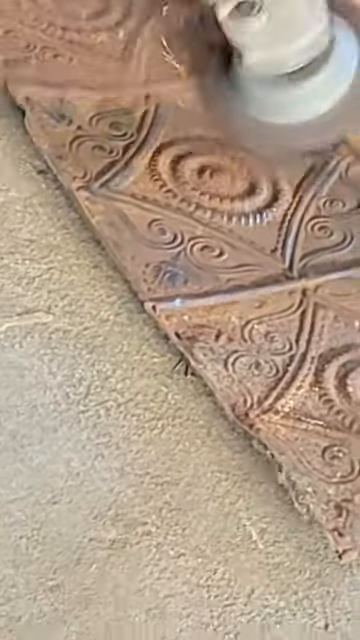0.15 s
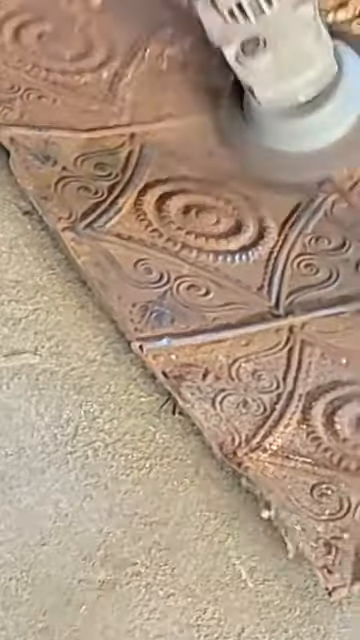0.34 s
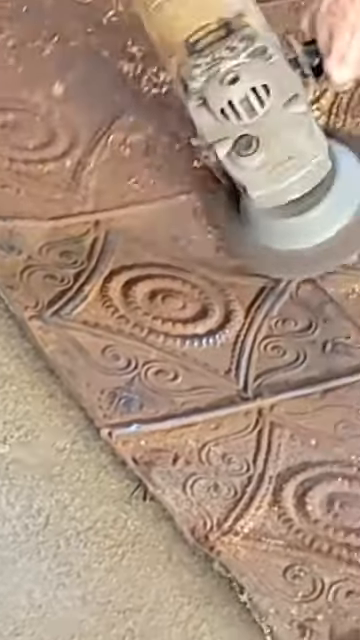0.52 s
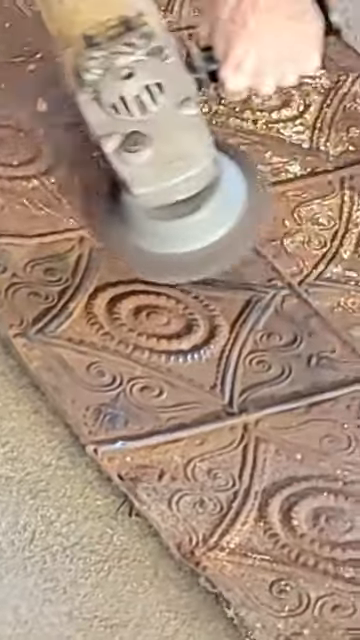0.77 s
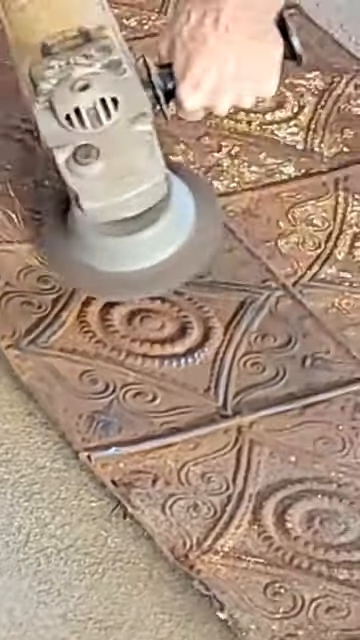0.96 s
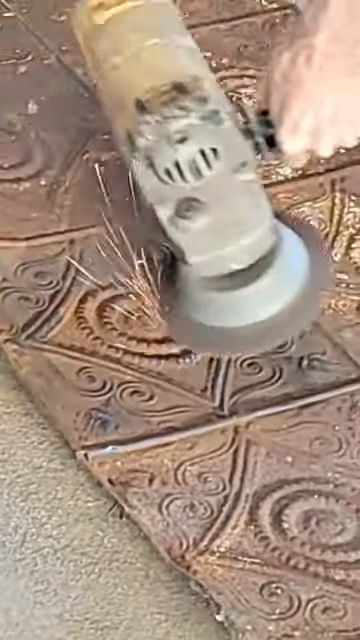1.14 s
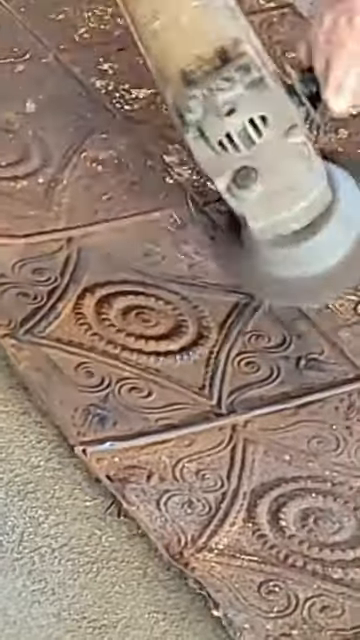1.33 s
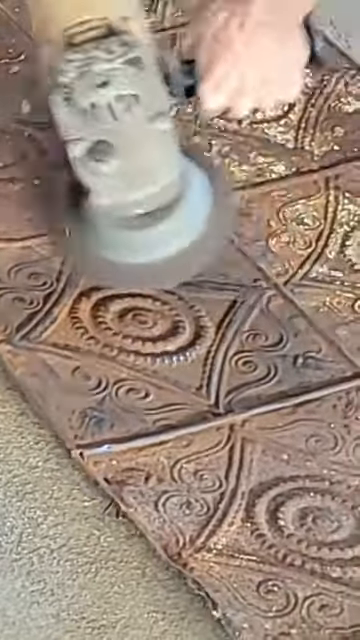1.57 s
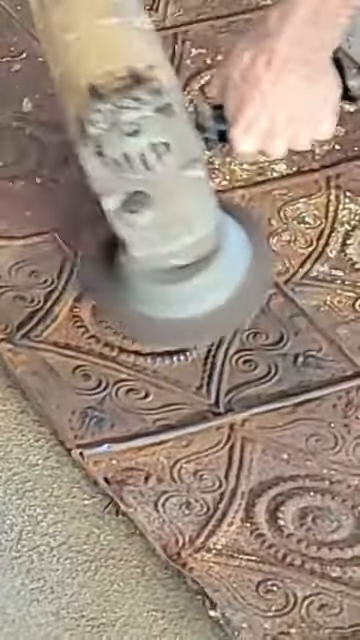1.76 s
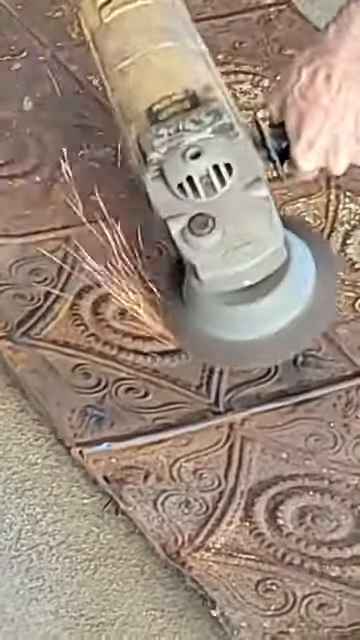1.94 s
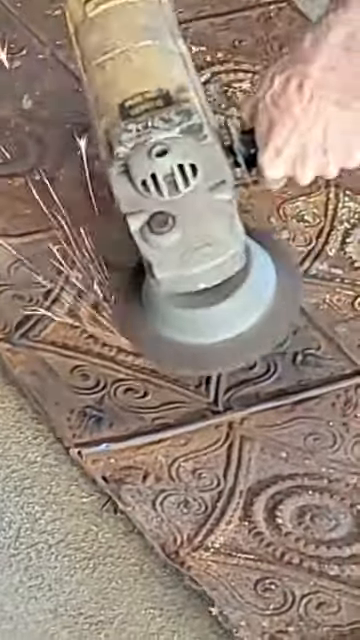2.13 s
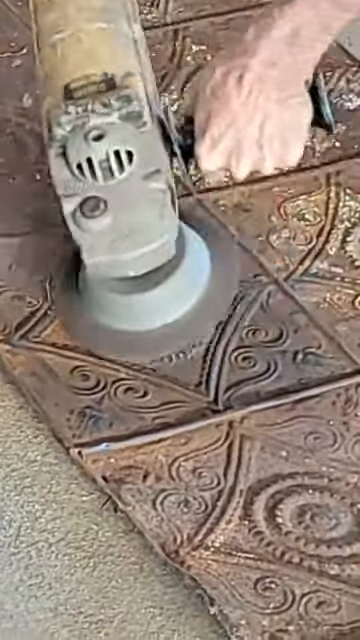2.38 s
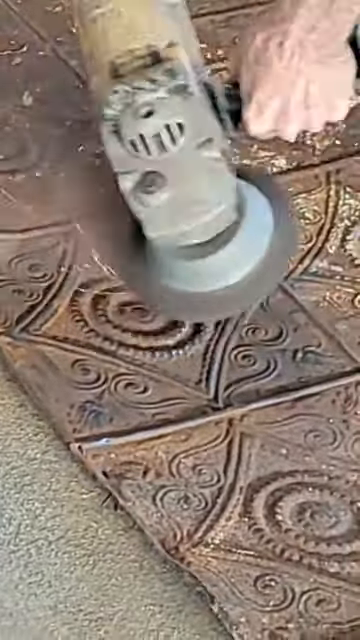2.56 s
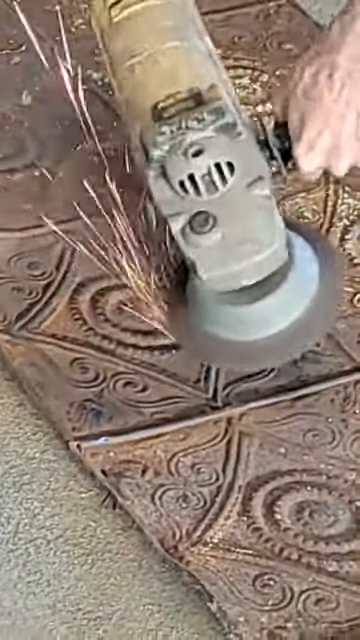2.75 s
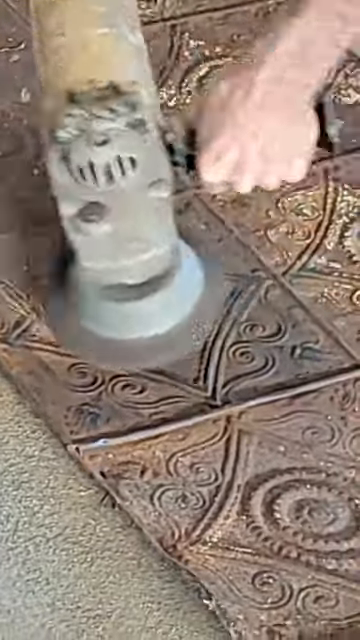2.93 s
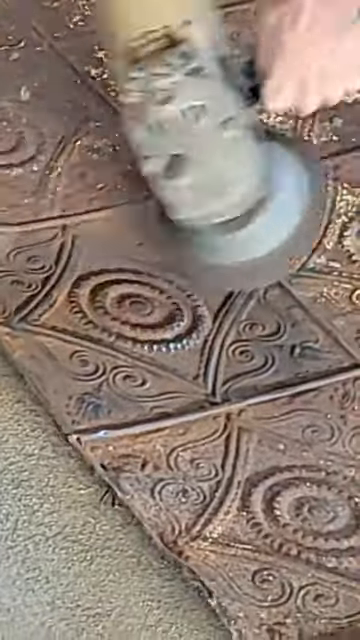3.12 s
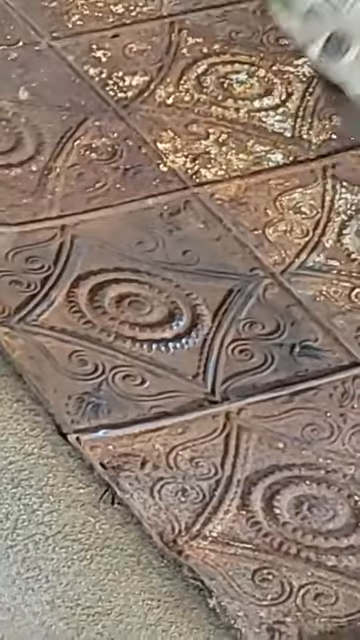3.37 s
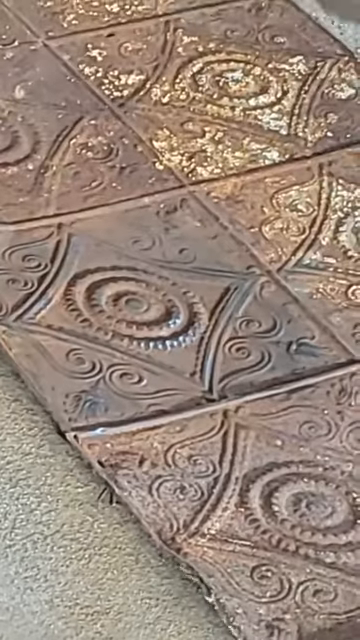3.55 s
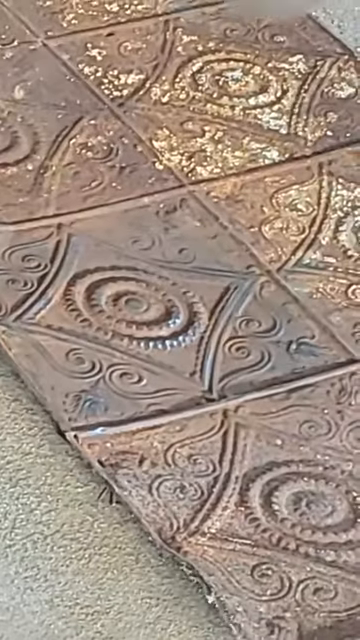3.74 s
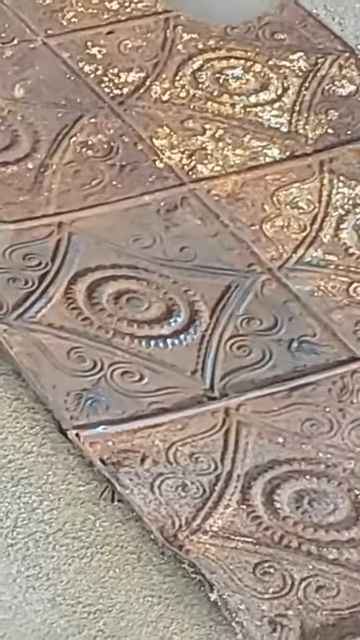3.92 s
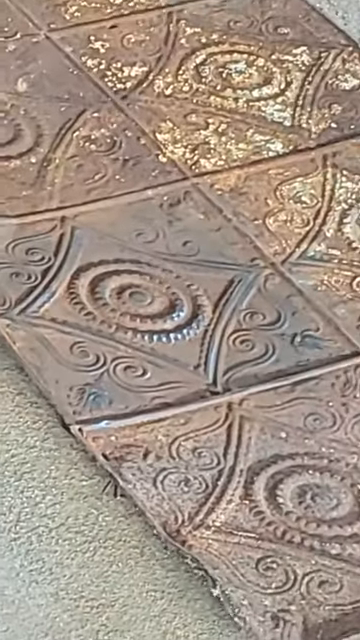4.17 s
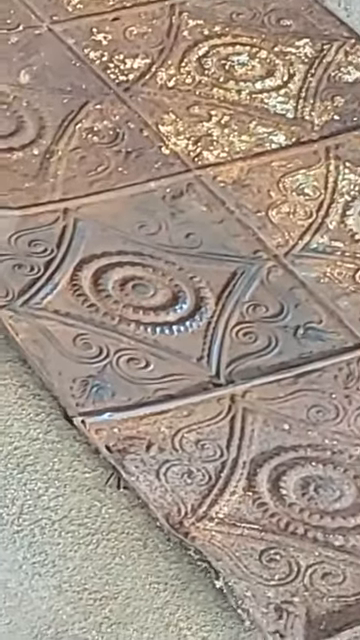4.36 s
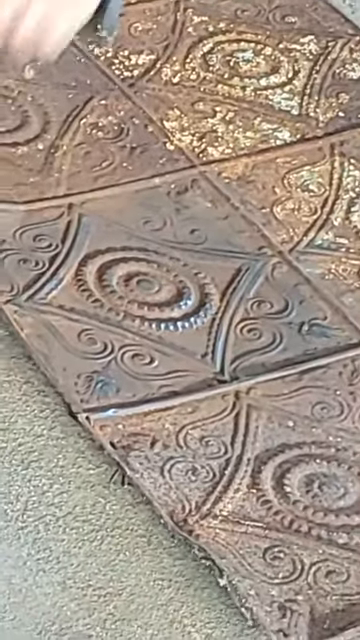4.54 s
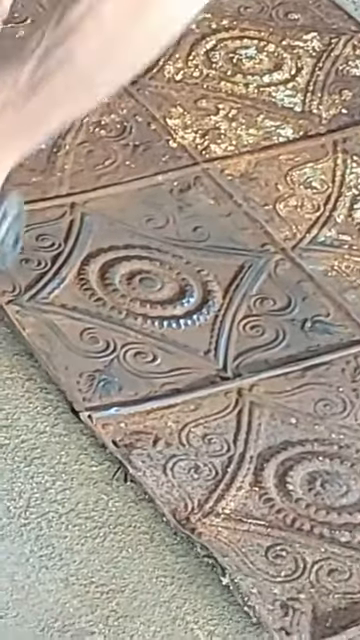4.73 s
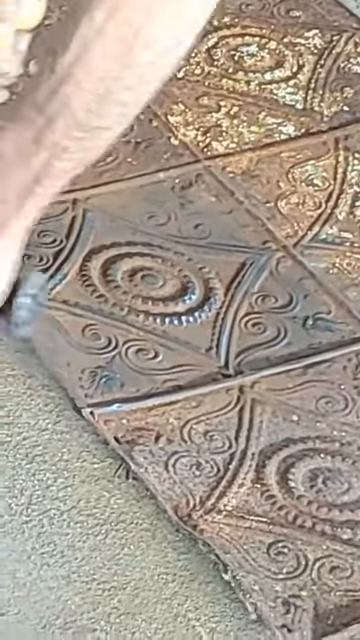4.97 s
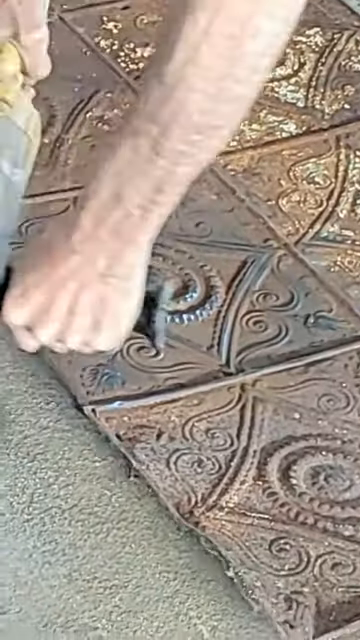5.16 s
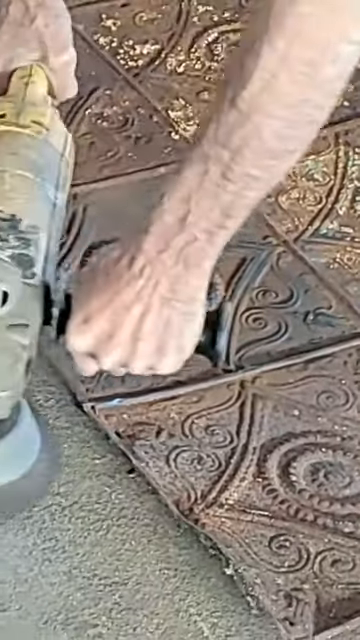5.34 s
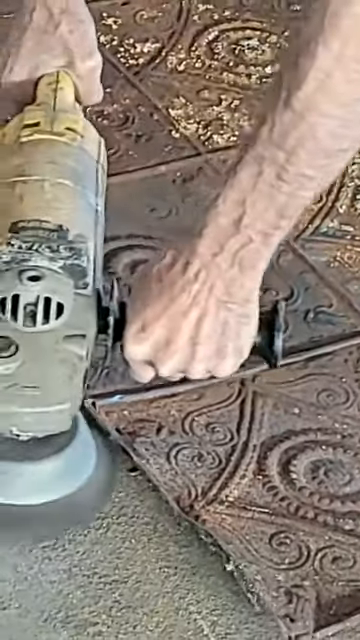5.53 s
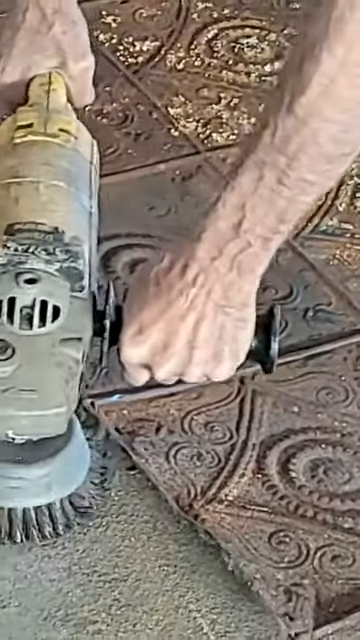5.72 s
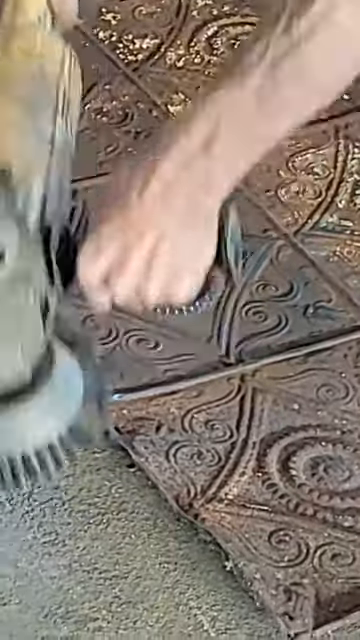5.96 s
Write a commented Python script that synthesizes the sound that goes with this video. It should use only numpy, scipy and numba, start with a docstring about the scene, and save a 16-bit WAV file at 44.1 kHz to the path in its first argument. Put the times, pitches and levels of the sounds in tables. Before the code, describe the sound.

A dense, abrasive scrape of steel wires on ringing iron fills the first half, throbbing rapidly, with short dips in its hiss and metallic tones singing through. It cuts off to a much quieter faint motor. Air noise swells again before a bright click, then a breathy whirr slides down in pitch. A short ringing wire rasp and tiny scuffs follow. Close single microphone, centred sound, short outdoor wall reflections.

```python
"""A spinning wire brush on an angle grinder scours a rusty embossed iron sheet: uneven wire hits ring and hiss.
After about 3 s the scouring stops, leaving faint moving air and a rotor hum, which later grow louder.
At about 4.6 s the tool is switched off with a click and coasts down, its blades whirring lower and lower.
Near 5.3 s tufts of the slowing brush ring the sheet again; the last ones scuff, as short puffs of noise.
A low outdoor rumble and a faint steady noise lie under it all, and the yard walls answer the tool."""
import sys
import numpy as np
from scipy import signal
from scipy.io import wavfile
from numba import njit

SR = 44100
rng = np.random.default_rng(int(sys.argv[2]) if len(sys.argv) > 2 else 0)


def bounce(signal):
    """Save signal as a 16-bit WAV file at the path given by the first command-line argument."""
    frames = np.transpose(np.atleast_2d(signal))
    limited = np.clip(frames, -1, 1)
    pcm = np.round(limited * 32767).astype(np.int16)
    wavfile.write(sys.argv[1], SR, pcm)


N = 268657  # samples, about 6.1 s


def from_db(db):
    """Turn decibels into a gain."""
    return 10 ** (np.asarray(db) / 20)


def rms_one(x):
    """Scale a sound to an average strength (rms) of 1."""
    return x / np.sqrt(np.mean(x ** 2) + 1e-20)


def in_time(rows):
    """Join the points of each table column by straight lines, one value a sample."""
    times, *columns = np.transpose(rows)
    t = np.arange(N) / SR
    return [np.interp(t, times, column) for column in columns]


def gate(start, end, rise, fall):
    """1 between start and end, with ramps outside them; all in seconds."""
    t = np.arange(N) / SR
    opening = np.clip((t - start) / rise + 1, 0, 1)
    closing = np.clip((end - t) / fall + 1, 0, 1)
    return opening * closing


def drift(rate):
    """Slow random wandering of spread 1: noise smoothed twice at rate [Hz]."""
    step = 40  # one slow value every 40 samples
    settle = 2000  # slow values thrown away while the filter settles
    r = np.exp(-2 * np.pi * rate * step / SR)
    noise = rng.standard_normal(N // step + settle + 2)
    slow = signal.lfilter([1], [1, -2 * r, r * r], noise)[settle:]
    return np.interp(np.arange(N) / step, np.arange(len(slow)), rms_one(slow))


def colour(sources, spectrum, patchy_db, patch_rate, count=3):
    """Shape two noises into bands, count to the octave, each wandering in level; rms 1."""
    hz, level_db = np.transpose(spectrum)
    edges = 20 * 2 ** np.arange(0, 9.8, 1 / count)
    edges = edges[(edges > hz[0]) & (edges < hz[-1] * 1.1)]
    out = 0
    for k, (low, high) in enumerate(zip(edges, edges[1:])):
        band_filter = signal.butter(2, [low, high], "band", fs=SR, output="sos")
        band = signal.sosfilt(band_filter, sources[k % 2])  # neighbours use different noises
        db = np.interp(np.log(low * high) / 2, np.log(hz), level_db)
        out = out + band * from_db(db + patchy_db * drift(patch_rate))
    return rms_one(out)


def wire_strikes(spread_db):
    """Two dense streams of uneven random hits; a larger spread makes them grittier."""
    strength_db = spread_db * np.minimum(rng.exponential(1, (2, N)), 5)
    return rms_one(rng.standard_normal((2, N)) * from_db(strength_db))


@njit
def sweep(x, hz, width_hz, sr):
    """A resonance, which favours one pitch, with a moving centre and width."""
    out = np.zeros(len(x))
    for i in range(2, len(x)):
        r = np.exp(-np.pi * width_hz[i] / sr)
        driven = (1 - r * r) / 2 * (x[i] - x[i - 2])
        ringing = 2 * r * np.cos(2 * np.pi * hz[i] / sr) * out[i - 1] - r * r * out[i - 2]
        out[i] = driven + ringing
    return out


def narrow_noise(hz, relative_width):
    """Noise sent twice through a moving resonance, level kept even as it narrows."""
    x = rng.standard_normal(N)
    for _ in range(2):
        x = sweep(x, hz, relative_width * hz, SR)
    return rms_one(x * np.sqrt(hz.mean() / hz))


def bursts(events, spectrum, rise_s, t60):
    """Gritty puffs of noise that fall 60 dB in t60 [s]; overlapping puffs add in power."""
    t = np.arange(N) / SR
    power = np.zeros(N)
    for start, level_db in events:
        after = np.maximum(t - start, 0)
        # the average noise strength sits 9.5 dB lower, leaving room for its peaks
        fading = from_db(level_db - 9.5 - 60 * after / t60)
        power += (fading * np.minimum(after / rise_s, 1)) ** 2
    noise = colour(wire_strikes(spread_db=0.5), spectrum, patchy_db=2.5, patch_rate=49)
    return np.sqrt(power) * noise


# colour of the faint steady noise: (frequency [Hz], relative level per hertz [dB])
FLOOR_COLOUR = [(120, -41), (200, -8.5), (373, -6.5), (456, -7), (1400, -10.5), (13600, -32.5),
                (16000, -16)]
FLOOR_DB = -62


def noise_floor(white):
    """Faint steady noise of fixed colour."""
    return from_db(FLOOR_DB) * colour(white, FLOOR_COLOUR, patchy_db=0.0, patch_rate=5.0)


# loudness of the outdoor rumble: (time [s], level [dB])
RUMBLE_LEVEL = [(0.0, -52), (0.22, -62), (0.47, -49), (0.61, -58.5), (0.8, -43), (0.83, -56.5),
                (1.61, -48.5), (2.19, -66), (2.32, -54.5), (2.8, -59.5), (2.85, -53), (3.09, -63),
                (4.16, -61), (4.65, -41.5), (6.04, -53), (6.09, -64)]
# colour of the rumble: (frequency [Hz], relative level per hertz [dB])
RUMBLE_COLOUR = [(15, -42), (25, -12), (44, -8.5), (60, 1.5), (76, -0.5), (124, -14), (200, -13),
                 (260, -43), (440, -120)]


def rumble(white):
    """Low outdoor rumble: deep noise that rises and falls."""
    level_db, = in_time(RUMBLE_LEVEL)
    return from_db(level_db) * colour(white, RUMBLE_COLOUR, patchy_db=2.0, patch_rate=9.1, count=5)


# time to fade by 60 dB [s], below and above the dividing frequency [Hz]
YARD_T60_S, YARD_TREBLE_T60_S, YARD_CUT_HZ = 0.55, 0.21, 760
YARD_DB = -12  # reverberation against the direct sound


def yard(x):
    """Walls answer after 6 ms with a dense tail that dies sooner in the treble."""
    t = np.arange(int(.6 * SR)) / SR
    white = rng.standard_normal(len(t))
    low = signal.lfilter(*signal.butter(1, YARD_CUT_HZ, fs=SR), white)
    low_tail = low * from_db(-60 * t / YARD_T60_S)
    treble_tail = (white - low) * from_db(-3.5 - 60 * t / YARD_TREBLE_T60_S)
    tail = (low_tail + treble_tail) * (t > .006)
    tail = tail / np.sqrt(np.sum(tail ** 2))
    return from_db(YARD_DB) * signal.fftconvolve(x, tail)[:N]


# the last tufts scuff: (time [s], level [dB])
SCUFF_TIMES = [(5.609, -40), (5.671, -38), (5.729, -35), (5.789, -43), (5.823, -41), (5.89, -42),
               (5.999, -59)]
# colour of the scuffs: (frequency [Hz], relative level per hertz [dB])
SCUFF_COLOUR = [(120, -31), (200, -11), (318, -20), (364, -17), (404, -14), (1560, -7), (1850, -14),
                (12000, -34), (15600, -63), (22000, -120)]


def last_scuffs():
    """The last tufts scuff to a stop, each a faint puff of noise."""
    return bursts(SCUFF_TIMES, SCUFF_COLOUR, rise_s=0.0096, t60=0.17)


# the switch clicks: (time [s], level [dB])
SWITCH_TIME = [(4.5725, 1)]
# colour of the click: (frequency [Hz], relative level per hertz [dB])
SWITCH_COLOUR = [(300, -41), (700, -20), (1320, -3), (3070, -19), (5940, -7), (7140, -2), (9400, -17),
                 (13800, 1), (16000, -18)]


def switch_click():
    """Switching off gives one short, bright burst of noise."""
    return bursts(SWITCH_TIME, SWITCH_COLOUR, rise_s=0.0067, t60=0.056)


# tufts catch the sheet: (time [s], sheet ring level [dB], wire hiss level [dB])
TOUCHES = [(5.296, -25, -12), (5.315, -23, -5), (5.341, -15, -7.5), (5.361, -13, -12), (5.381, -12.5, -6),
           (5.395, -11.5, -7.5), (5.418, -12.5, -31), (5.44, -31, -27)]
# colour of the touched sheet: (frequency [Hz], relative level per hertz [dB])
TOUCH_RING_COLOUR = [(88, -51), (150, -19), (373, -13.5), (413, -19), (492, -8), (546, -10), (587, -7),
                     (1100, -2), (5000, -7.5), (6500, -34), (11000, -120)]
# colour of the touching wires: (frequency [Hz], relative level per hertz [dB])
TOUCH_HISS_COLOUR = [(2350, -16), (4000, -6), (4600, -11), (6820, 1), (9380, -13), (12800, 5),
                     (14600, -3.5), (16000, -14)]


def last_touch():
    """Each tuft of the slowing brush rings the sheet and hisses."""
    rows = np.array(TOUCHES)
    ring = bursts(rows[:, [0, 1]], TOUCH_RING_COLOUR, rise_s=.006, t60=0.23)
    hiss = bursts(rows[:, [0, 2]], TOUCH_HISS_COLOUR, rise_s=0.0034, t60=0.18)
    return ring + hiss


# free-running motor, then switched off and coasting: (time [s], rotor speed [turns/s])
MOTOR_SPEED = [(2.9, 330), (3.99, 290), (4.5, 272), (4.64, 257), (4.79, 214), (5.0, 146), (5.17, 90),
               (5.25, 68), (5.45, 30)]
# levels of the free-running motor, faint at first, then louder, then coasting down:
# (time [s], cooling air level [dB], treble level against the air [dB], rotor tone level [dB])
MOTOR_LEVELS = [(3.0, -42.5, 0, -57), (3.1, -44, 1, -56), (3.35, -44.5, -3, -55.5), (3.6, -46, -2.5, -63),
                (4.1, -43.5, 0, -61), (4.21, -41.5, 0.5, -56), (4.33, -34.5, -7, -49), (4.45, -29, -5, -58),
                (4.55, -29.5, -2.5, -41), (4.64, -26, 1.5, -40.5), (4.75, -26.5, 3, -51),
                (4.87, -27.5, 3, -54), (5.05, -29.5, 0.5, -64), (5.29, -36, 3.5, -80)]


def rotor_tone():
    """The rotor's unbalance hums once a turn, with a blurred octave above."""
    turns, = in_time(MOTOR_SPEED)
    _, _, tone_db = in_time(MOTOR_LEVELS)
    hum = np.sin(2 * np.pi * np.cumsum(turns) / SR) * from_db(0.75 * drift(7.3))
    octave = narrow_noise(2 * turns, 0.1)
    return gate(2.98, 7.0, 0.033, .1) * from_db(tone_db) * (hum + octave)


# colour of the cooling air: (frequency [Hz], relative level per hertz [dB])
AIR_COLOUR = [(71, -41), (120, -36), (220, -10), (271, -13), (368, -10.5), (540, -5), (1070, 0),
              (1180, -8.5), (1530, 2), (2550, -1.5), (3810, 0), (5500, -5.5), (7150, -4), (12100, -120)]
# colour of its treble: (frequency [Hz], relative level per hertz [dB])
TREBLE_COLOUR = [(2650, -49), (4500, -24), (7140, 1), (9310, -9), (10900, 3), (12700, 1), (15100, 1.5),
                 (16000, -12)]
# air of the brush idling at the end: (time [s], level [dB])
IDLE_AIR = [(5.5, -46), (5.6, -60), (5.74, -60), (5.85, -83), (6.09, -57.5)]
IDLE_TREBLE_DB = -2.5  # against the idling air
BLADES = 12
# blades whirr out of the air while the motor coasts
COAST_FROM_S, COAST_TO_S, COAST_FADE_S = 4.56, 5.25, 0.04
# blade whirr level against the air, when coasting and when not coasting
BLADE_COASTING_DB, BLADE_RUNNING_DB = 1, -35


def motor():
    """Rushing cooling air, and a noisy whirr whose pitch is rotor speed times blade count."""
    turns, = in_time(MOTOR_SPEED)
    air_db, treble_db, _ = in_time(MOTOR_LEVELS)
    idle_db, = in_time(IDLE_AIR)
    coasting = gate(COAST_FROM_S, COAST_TO_S, COAST_FADE_S, COAST_FADE_S)
    blade_db = BLADE_RUNNING_DB + (BLADE_COASTING_DB - BLADE_RUNNING_DB) * coasting
    noise = wire_strikes(spread_db=3.0)
    air = colour(noise, AIR_COLOUR, patchy_db=2.0, patch_rate=11.7)
    treble = colour(noise, TREBLE_COLOUR, patchy_db=-1.2, patch_rate=33)
    whirr = narrow_noise(BLADES * turns, 0.15 + 0.67 * (turns / 270) ** 3)  # turbulence blurs it at speed
    running = from_db(air_db) * (air + from_db(treble_db) * treble + from_db(blade_db) * whirr)
    idling = from_db(idle_db) * (air + from_db(IDLE_TREBLE_DB) * treble)
    return gate(2.95, 5.3, .03, .1) * running + gate(5.45, 7, .03, .1) * idling


# whole multiples of the spindle speed made by tufts and gear teeth (37 is the gear mesh): [multiple]
TONE_MULTIPLES = [2, 5, 7, 9, 10, 13, 14, 15, 16, 20, 21, 23, 24, 25, 27, 31, 35, 37, 39, 41, 43, 44]
# their mid levels, in the same order: [dB against the sheet's ring]
TONE_LEVELS = [-43, -36, -31.5, -18.5, -25, -18.5, -15, -15.5, -21, -15, -17, -25, -14, -20.5, -21, -33,
               -23, -14, -14.5, -28.5, -16.5, -19]


def spindle_tones(angle, steadiness):
    """Tufts and gear teeth sound wavering tones, clearest while the brush is held steady."""
    out = 0
    for multiple, level_db in zip(TONE_MULTIPLES, TONE_LEVELS):
        level = from_db(level_db + 5.6 * drift(12.0))
        out = out + level * np.sin(multiple * angle + 1.34 * drift(5.27))
    return from_db(0.9 * (steadiness - 0.5)) * out


# one multiple of the spindle speed sings out:
# (time of the swell's middle [s], multiple, level before a 5 dB lift [dB], rough length [s])
SINGING_TONES = [(.39, 9, -32, .19), (.42, 27, -26, .12), (.51, 21, -27, .11), (.57, 15, -27, .09),
                 (.65, 27, -26, .07), (.65, 82, -26, .05), (.72, 41, -29, .14), (.73, 37, -24, .09),
                 (.74, 25, -28, .16), (.74, 39, -25, .15), (.87, 13, -26, .08), (.9, 16, -24, .07),
                 (.9, 25, -25, .1), (.92, 43, -27, .08), (1.47, 37, -29, .11), (1.54, 43, -28, .05),
                 (1.82, 13, -29, .18), (1.94, 23, -29, .17), (2.07, 27, -29, .13), (2.25, 39, -28, .06),
                 (2.59, 23, -29, .21), (1.83, 36, -27, .13), (1.86, 37, -22, .15), (1.95, 35, -26, .07),
                 (2.37, 20, -28, .2), (2.43, 44, -26, .08), (2.61, 37, -26, .08), (2.62, 14, -28, .11)]


def singing(angle):
    """Single multiples of the spindle speed swell and fade in a bell shape."""
    t = np.arange(N) / SR
    out = np.zeros(N)
    phases = rng.uniform(0, 2 * np.pi, len(SINGING_TONES))
    for (middle, multiple, level_db, length), phase in zip(SINGING_TONES, phases):
        near = slice(int(max(middle - 2 * length, 0) * SR), int((middle + 2 * length) * SR))
        swell = np.exp(-((t[near] - middle) / (0.47 * length)) ** 2)
        out[near] += from_db(level_db + 5.0) * swell * np.sin(multiple * angle[near] + phase)
    return out


@njit
def repeat_turns(fresh, lag, share):
    """Each turn keeps a share of the strikes of the turn before, lag samples ago."""
    out = fresh.copy()
    for i in range(out.shape[1]):
        if i >= lag[i]:
            kept = share[i] * out[:, i - lag[i]]
            out[:, i] = kept + np.sqrt(1 - share[i] ** 2) * fresh[:, i]
    return out


# spindle under load: (time [s], speed [turns/s], steadiness of the brush [0-1])
SPINDLE_SPEED = [(0, 81.2, 0.3), (0.19, 80.3, 0.4), (0.37, 82, 0.8), (0.45, 81.4, 0.45), (0.55, 80.4, 0.38),
                 (0.62, 81.4, 0.35), (0.69, 80.5, 0.5), (0.77, 79.3, 0.35), (0.89, 77.2, 0.65),
                 (1.07, 77.2, 0.3), (1.2, 79, 0.3), (1.47, 77.6, 0.5), (1.57, 78.6, 0.3),
                 (1.77, 75.4, 0.45), (1.85, 75.1, 0.8), (1.95, 74.6, 0.65), (2.05, 73.6, 0.3),
                 (2.19, 75, 0.3), (2.45, 74.1, 0.45), (2.63, 72.3, 0.5), (2.81, 74.3, 0.2),
                 (2.96, 73.8, 0.12)]
# how hard the sheet rings under the brush, before the throb: (time [s], level [dB])
SCOUR_LEVEL = [(0.0, -21.5), (0.06, -17), (0.14, -23.5), (0.15, -18.5), (0.25, -27.5), (0.37, -18.5),
               (0.59, -17), (0.62, -20), (0.73, -20.5), (0.77, -22), (0.9, -17.5), (1.11, -23), (1.2, -17),
               (1.24, -23.5), (1.39, -17), (1.46, -23.5), (1.64, -17.5), (1.68, -19), (1.86, -19),
               (2.19, -19), (2.2, -19), (2.66, -17), (2.84, -19), (2.93, -18)]
# colour of the ringing sheet: (frequency [Hz], relative level per hertz [dB])
SHEET_COLOUR = [(65, -66), (110, -22.5), (147, -25.5), (518, -21), (701, -8.5), (891, -5.5), (1010, 0),
                (1390, -2.5), (1510, -0.5), (1920, 1.5), (2400, 0.5), (2860, 3.5), (4330, -8), (5000, -8),
                (6500, -26.5), (11000, -120)]
# colour of the hissing wires: (frequency [Hz], relative level per hertz [dB])
WIRE_COLOUR = [(2350, -30.5), (4000, 1.5), (4340, -5), (4650, -4), (6860, 0), (9380, -11), (10900, -5.5),
               (13100, -0.5), (15100, -7), (16000, -15)]
# the hiss sags as the brush eases off or rides over a ridge; a negative loss is a brief swell:
# (time of the middle [s], loss [dB], half-length [s])
HISS_EASINGS = [(0.055, 2, 0.013), (0.13, -1.5, 0.012), (0.266, 9, 0.07), (0.54, 2.5, .04),
                (0.9, 2.5, 0.033), (1.094, 0.5, 0.019), (1.23, 6, 0.036), (1.328, 6.5, 0.018),
                (1.528, 3, 0.015), (2.08, 2.5, 0.066), (2.323, 4, 0.029), (2.513, 2, 0.019),
                (2.634, 1.5, 0.081), (2.778, 3, 0.023)]
HISS_DB, HISS_FOLLOWS = -17, .15  # level at a ring of -18 dB, and share of the ring's swing it follows
SCOUR_END_S = 2.94


def brush():
    """The same tufts pass each turn, so strikes partly repeat and the load throbs once a turn."""
    turns, steadiness = in_time(SPINDLE_SPEED)
    ring_db, = in_time(SCOUR_LEVEL)
    t = np.arange(N) / SR
    hiss_db = HISS_DB + HISS_FOLLOWS * (ring_db + 18)
    for middle, loss_db, length in HISS_EASINGS:
        hiss_db = hiss_db - loss_db * np.exp(-((t - middle) / length) ** 2)
    scouring = gate(-1, SCOUR_END_S, .01, 0.02)
    share = np.clip(0.75 * steadiness, 0, .9) * scouring
    lag = np.round(SR / turns).astype(np.int64)  # samples in one turn
    angle = 2 * np.pi * np.cumsum(turns) / SR
    throb = from_db((0.5 + 0.62 * drift(4.0)) * np.cos(angle) + 0.91 * drift(34))

    ring_hits = repeat_turns(wire_strikes(spread_db=1.5), lag, share)
    ring = colour(ring_hits, SHEET_COLOUR, patchy_db=3.0, patch_rate=4.85, count=6)
    hiss_hits = repeat_turns(wire_strikes(spread_db=2.5), lag, 0.65 * share)
    hiss = colour(hiss_hits, WIRE_COLOUR, patchy_db=1.86, patch_rate=17.0, count=6)

    scour = from_db(ring_db) * (ring + spindle_tones(angle, steadiness))
    scour = scour + from_db(hiss_db) * hiss + singing(angle)
    return throb * scouring * scour


def scene():
    """Tool and sheet in the yard, over rumble and a faint floor; one microphone, two equal channels."""
    tool = brush() + motor() + last_touch() + switch_click() + last_scuffs()
    white = rng.standard_normal((2, N))  # shared by the rumble and the floor
    mono = tool + yard(tool) + rotor_tone() + rumble(white) + noise_floor(white)
    return np.tile(mono, (2, 1))


CUTOFF_HZ = 15700


def record(dry):
    """Peaks are rounded off, then the top of the treble is cut."""
    rounded = 1.177 * np.tanh(dry / 1.332)
    return signal.sosfilt(signal.ellip(12, .5, 80, CUTOFF_HZ, fs=SR, output="sos"), rounded)


dry = scene()
out = record(dry)
bounce(out)
```